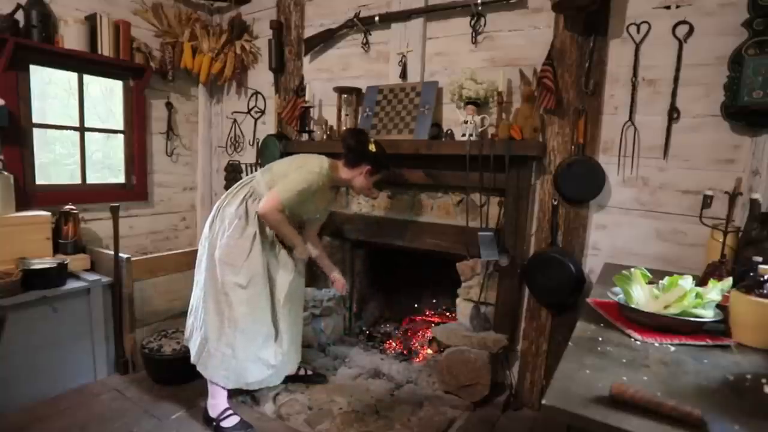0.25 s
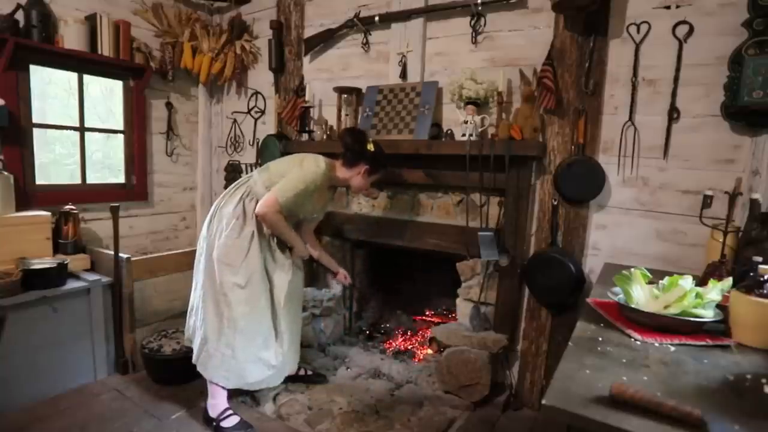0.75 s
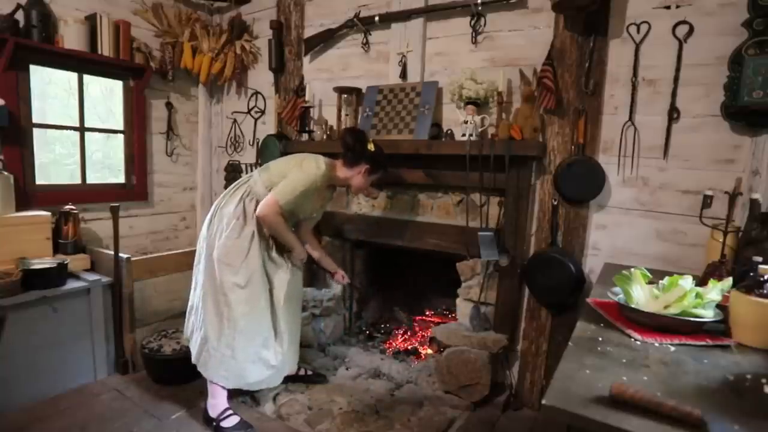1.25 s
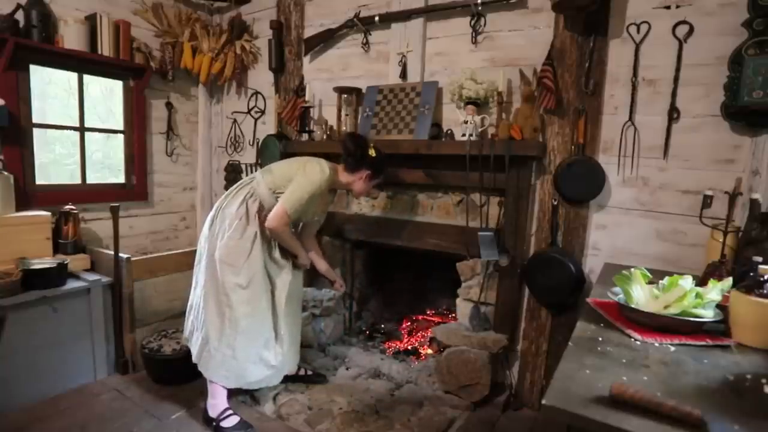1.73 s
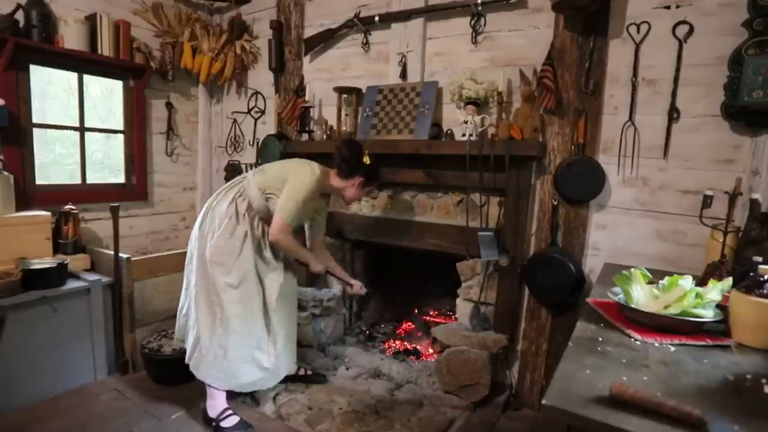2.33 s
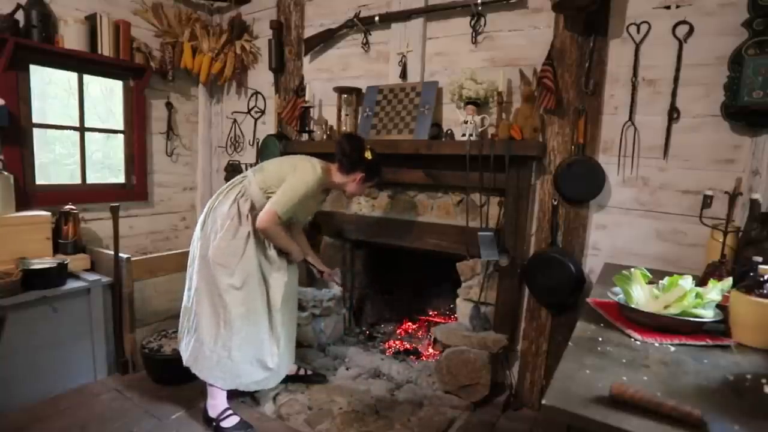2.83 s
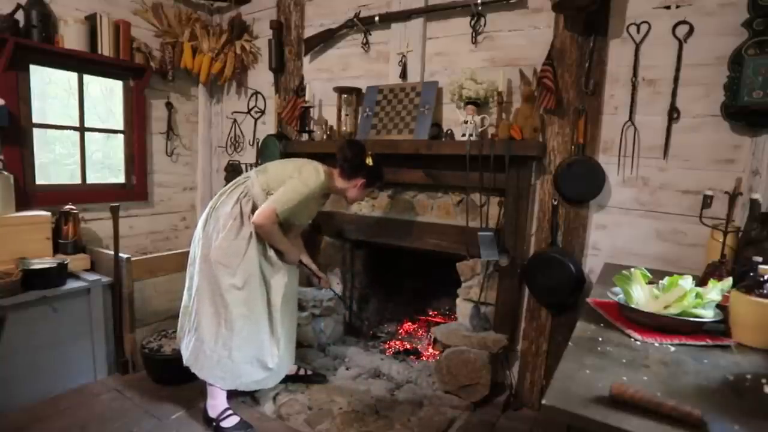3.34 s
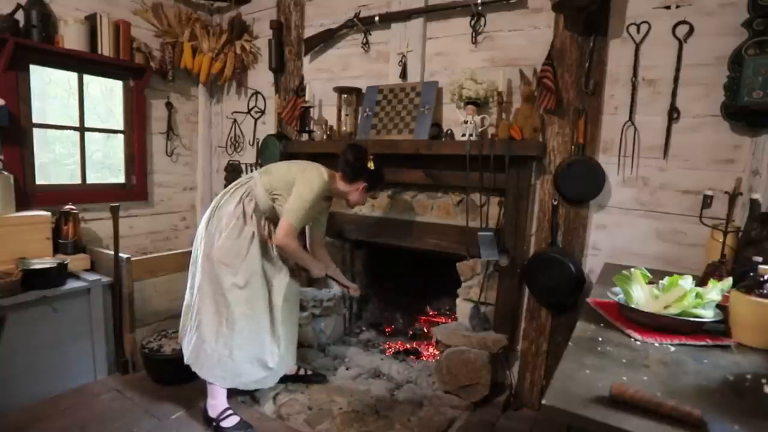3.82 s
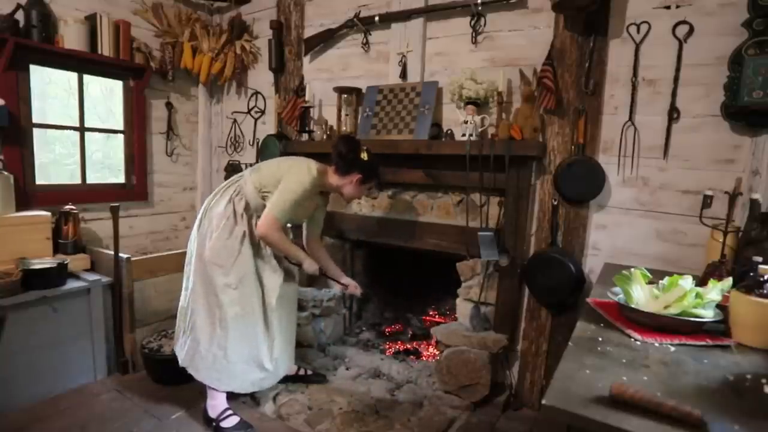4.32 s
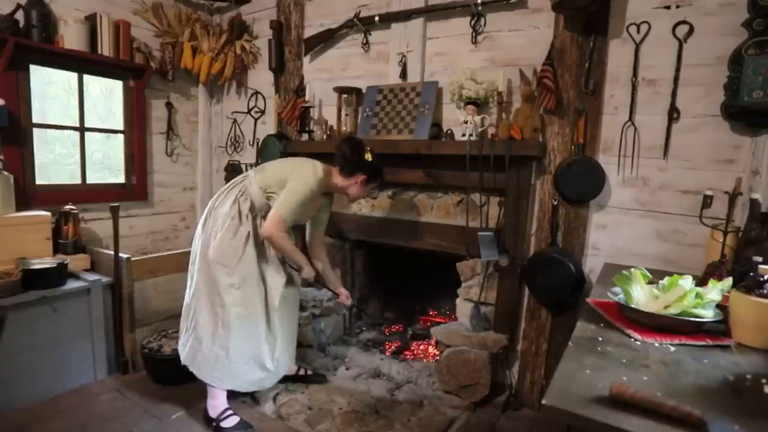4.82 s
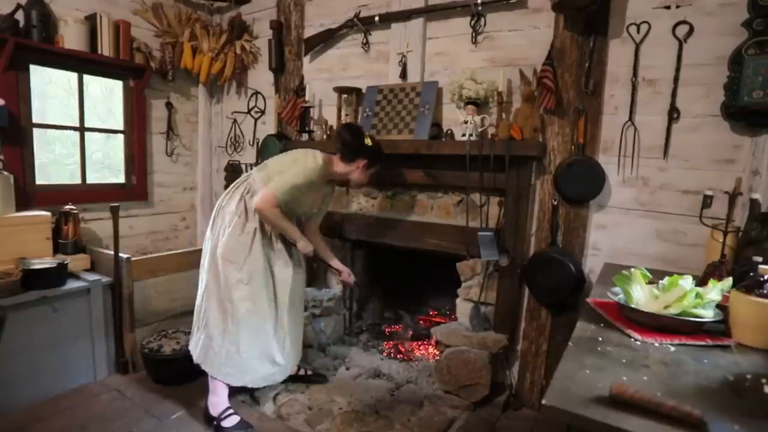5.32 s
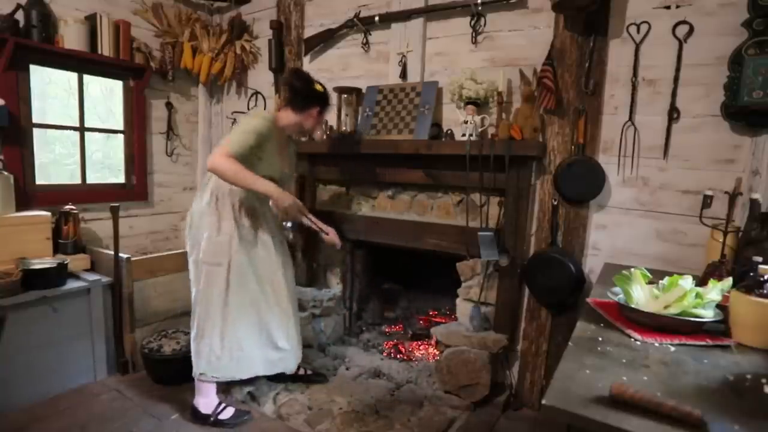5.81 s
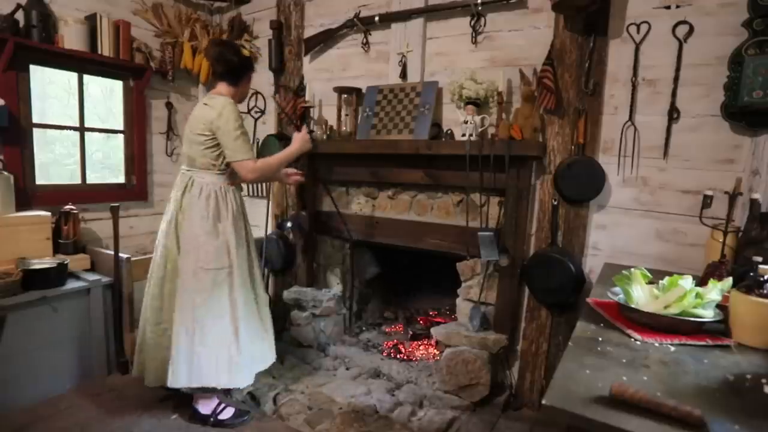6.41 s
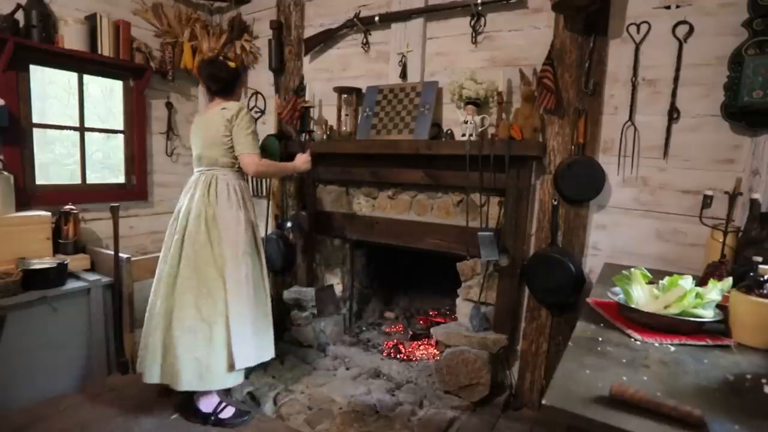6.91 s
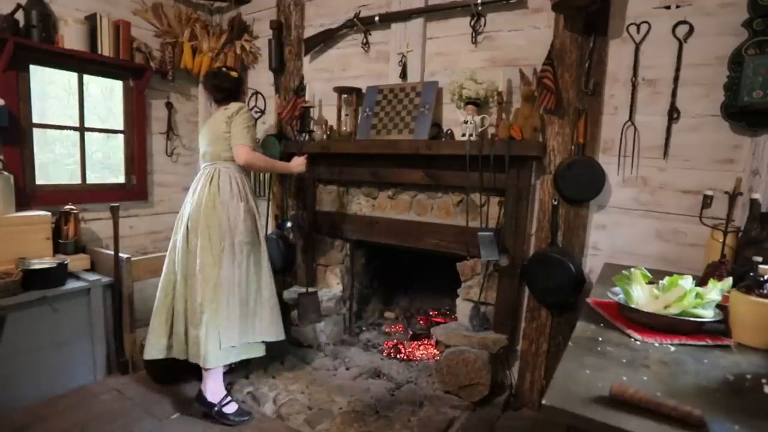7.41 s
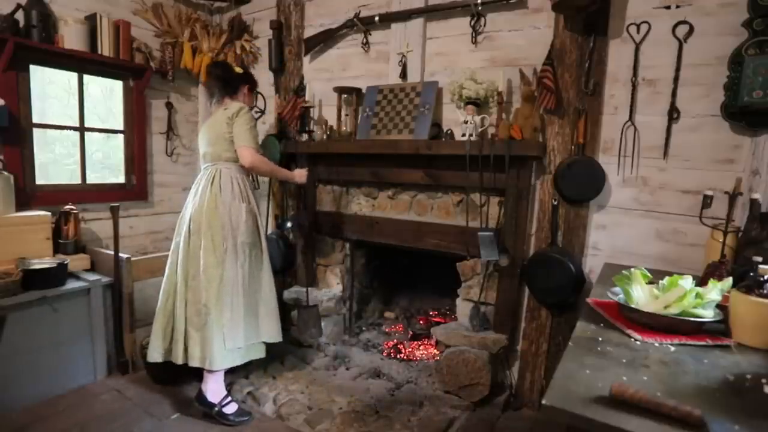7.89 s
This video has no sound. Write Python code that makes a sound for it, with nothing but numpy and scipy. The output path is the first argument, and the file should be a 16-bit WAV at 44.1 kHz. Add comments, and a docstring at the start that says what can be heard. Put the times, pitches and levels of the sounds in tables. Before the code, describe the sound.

Gritty scraping and clanking of an iron fire shovel in hot coals, a few dull steps, then one clear metal pan clang at the end.

```python
"""Shovel, embers and hanging pan

An iron shovel knocks on a stone hearth and rakes hot coals: random grains, shaped by contact force, excite iron modes.
Near the end a hanging iron pan is struck and rings as a sum of decaying sines, some of them swelling in slowly.
Steps, dropped coals and the wall behind the pan thud (noise bands and low sines); a skirt swishes (swelling noise).
Embers, crushed coals and iron tick (short noise bursts) over the fire's draught (filtered noise).
A small wooden room adds decaying noise as its echo; the recorder's gain control ducks after the loudest blows."""
import sys
import numpy as np
from scipy import signal
from scipy.fft import rfft, irfft, next_fast_len
from scipy.io import wavfile

SR = 44100
rng = np.random.default_rng(int(sys.argv[2]) if len(sys.argv) > 2 else 0)


def transcribe(u):
    """Save the signal u as a 16-bit wav file named by the first command-line argument.

    u: samples, shape (n,) or (channels, n), limited to [-1, 1]; the rate is SR.
    q: integer samples, one column per channel.
    """
    v = np.clip(np.atleast_2d(u).T, -1, 1)
    q = np.round(v * 32767).astype(np.int16)
    wavfile.write(sys.argv[1], SR, q)


N = 359415
TIME = np.arange(N) / SR   # [s]
CUTOFF_HZ = 16100   # top edge of the recorder, and of the iron's crowded upper modes

# shovel knocks and rings: struck, set down or leaned; the first row already rings at the start:
# (time [s], crunch level [dB], grit level [dB], contact time [s],
# blade ring [dB], shank ring [dB], frequency of the favoured modes [Hz])
KNOCKS = [(0.0, -48, -45, 0.0047, -62, -39.5, 1650), (0.3081, -26, -12.5, 0.002, -24, -44, 3000),
          (0.3117, 11, 1.5, 0.0024, -1, -25, 2450), (0.9958, -17.5, -6, 0.0016, -28.5, -43, 1200),
          (1.0006, -4, -12, 0.0028, -18.5, -47, 1100), (1.116, -21, -23, 0.0056, -26, -26.5, 1076),
          (1.589, -16.5, -13, .0048, -21.5, -14, 3140), (2.106, -19, -10.5, 0.0011, -19, -39, 5470),
          (2.1644, -19.5, -13, 0.0063, -18, -50, 2780), (2.211, -21, -21, 0.0088, -23.5, -52, 6500),
          (2.344, -14, -22, .006, -28, -40, 2200), (2.39, -22, -20, .0023, -31, -17, 2440),
          (2.9615, -23.5, -29, 0.0016, -51, -16, 730), (3.1065, -25, -25, 0.016, -48, -17, 2400),
          (3.195, -26, -30, .008, -41, -19, 2240), (3.272, -27, -24.5, .0034, -34, -13.5, 600),
          (3.53, -30, -48, 0.0048, -39, -50, 1650), (4.0595, -34, -24, 0.0022, -49, -15.5, 4700),
          (4.108, -48.5, -32.5, .004, -41, -22, 3680), (4.167, -49, -37.5, .0033, -60, -27, 1700),
          (4.651, -32, -29, 0.0081, -41, -41, 2400), (4.763, -11, -26, 0.0071, -19, -50, 2100),
          (4.831, -17, -21.5, 0.0045, -18.5, -45, 1300), (6.0, -55, -70, .016, -35.5, -58, 1180)]
# lumps of coal break under the blade: (time [s], crunch level [dB], grit level [dB], contact time [s])
LUMPS = [(0.558, -39.5, -41, 0.0187), (0.655, -34.5, -33.5, 0.00558), (0.921, -47, -50, .012),
         (1.516, -35.5, -35, 0.00604), (1.549, -39.5, -31, 0.00573), (1.826, -31, -31.5, 0.0074),
         (1.950, -60, -18, .001), (1.962, -29, -19.5, 0.0058), (1.9864, -14, -13, .003),
         (2.08, -35.5, -26.5, 0.0048), (2.325, -20, -30, .007), (2.471, -42, -22, 0.000975),
         (3.226, -29, -15.5, .004), (3.433, -28.5, -21, .0033), (3.638, -11.5, -12, 0.0023),
         (3.661, -14, -19, .003), (3.705, -21.5, -26.5, 0.0083), (3.9201, -20.5, -23, .002),
         (3.967, -30, -20.5, .003), (4.893, -32, -18.5, 0.00297), (5.014, -34, -42.5, .007)]
# blade drawn through the coals, or its load tipped out: (time [s], length [s], grinding level [dB],
# extra bite on entry [dB], ash hiss level [dB], change of hiss along the stroke [dB])
STROKES = [(1.514, 0.062, -38, 0, -44, 4), (1.595, 0.25, -38, 11.5, -38, 5),
           (1.989, 0.33, -33.5, 7, -35.5, 10), (2.29, .08, -20, -14, -21, -9),
           (3.196, .20, -29.5, 14.5, -29.5, 3.5), (3.435, 0.32, -29, -2.5, -36, 4.5),
           (3.85, 0.14, -36.5, -6, -37, 2), (4.063, 0.023, -33, 1.5, -28, -4),
           (4.769, .12, -25.5, 0, -26, -4.5)]
# moments when the blade sinks into ash, which smothers its ring: (time [s])
ASH_PLUNGES = [.55, 1.3, 2.5, 3.17, 4.26, 5.0]
# modes of the blade and of the long shank: (frequency [Hz], relative level [dB], T60 [s])
BLADE_MODES = [(941, -8.5, 0.89), (1058, 3, 0.43), (1154, -6, 0.38), (1340, 13, 0.19), (1505, -8, .45),
               (1556, -14.5, 0.41), (1860, -9, 0.3), (1970, -1, 0.19), (2070, -5.5, 0.23), (2267, 1.5, 0.4),
               (2360, -6, 0.66), (2547, 1, 0.27), (2570, 1.5, 0.27), (2660, -11, 0.7), (2700, -6, .35),
               (2954, 6.5, 0.52), (3030, -21, 0.39), (3180, -8, 0.45), (3673, -15.5, 0.69),
               (3810, 7.5, 0.4), (3867, 1, 0.5), (4250, -17, 0.6), (5308, -9, .28), (5300, 4.5, 0.41),
               (5860, -4, 0.095), (6260, -1.5, 0.6), (6940, -27, 0.81), (7434, -29, 0.15),
               (7790, -19.5, 0.08), (9400, -2.5, .22)]
SHANK_MODES = [(446, -4.5, 0.21), (469, 1.5, .18), (807, -15, 1.2), (782, -22, 1.6), (1013, -9, 0.42),
               (1394, -22.5, 1.1), (1770, -30.5, 0.34), (1910, -18, 0.46), (2025, 2, 0.84), (2474, 1, 0.37),
               (2600, -22.5, 0.59), (2618, 9, 0.19), (2830, 1, 0.45), (3370, -9, 0.42), (3945, -5.5, 0.61),
               (4060, -0.5, 0.29), (4360, -16, .5), (4600, 0, .2), (5316, -1.5, 0.52), (5400, -23.5, 0.28),
               (6530, -13, 0.31), (7012, 7.5, 0.083), (7800, -6.5, .25), (8400, -0.5, 0.19),
               (9050, -19.5, 0.15), (9800, -1.5, 0.19), (11600, 2.5, .2)]
# modes of the hanging pan: (frequency [Hz], relative level [dB], T60 [s], swell time constant [s])
PAN_MODES = [(647, -0.5, 0.61, 0.069), (1154.3, 2, 0.66, 0.026), (1385, -13, 0.31, 0.0025),
             (1777, -17.5, 0.95, 0.0018), (2100, -24.5, 1, 0.0051), (2591, -5.5, 0.56, 0.082),
             (2920, -18, 0.69, 0.073), (1088, 5, 0.083, 0.0047), (3630, -26.5, 0.203, .002),
             (4510, -19.5, 0.13, 0.0011), (4840, -30, 0.13, .002), (5180, -24, 0.19, .002),
             (5860, -31, 0.15, .002), (6718, -35, .2, .002), (7820, -26, 0.1, .002)]
# dull thuds: steps, dropped coals, and the wall behind the struck pan: (time [s], level [dB],
# contact time [s], top edge [Hz], boom level [dB], boom frequency [Hz])
THUDS = [(0.31, -24, .002, 500, -37, 170), (3.19, -29.5, 0.027, 704, -53, 162),
         (3.66, -35, 0.025, 400, -50, 157), (4.058, -16.5, 0.0034, 436, -27, 148),
         (4.10, -32, 0.005, 302, -41, 138), (5.609, -37, 0.011, 397, -29, 121),
         (5.731, -23.5, 0.0048, 610, -27.5, 142), (6.683, -22.5, 0.0057, 427, -21.5, 149.6),
         (6.727, -27, 0.0055, 630, -25.5, 166), (6.80, -43, 0.032, 396, -48, 170),
         (7.549, -45, 0.019, 300, -60, 164), (7.809, -27, .02, 590, -43, 130)]
# skirt swings or a sole brushes the floor: (time of peak [s], level [dB], half-width [s])
SWISHES = [(5.489, -36, 0.039), (5.64, -36, 0.024), (5.74, -44, 0.05), (6.04, -41, 0.035),
           (6.74, -36, 0.013), (6.861, -33, 0.043), (7.445, -43.5, .02), (7.58, -42, 0.028)]
# short ticks: embers crack, coals crush under the blade, iron clinks:
# (time [s], relative peak level [dB], resonance [Hz])
TICKS = [(0.2034, -34, 2030), (0.811, -30, 13600), (0.8786, -25.5, 9440), (1.328, -31, 12400),
         (1.8264, -9.5, 2930), (2.6432, -25, 9300), (2.7375, -32, 2620), (3.7978, -17.5, 4850),
         (3.8248, -14.5, 2400), (4.2878, -31, 3830), (4.3994, -30.5, 2030), (4.483, -32.5, 9000),
         (4.5242, -29, 10600), (5.255, -25, 3450), (5.3024, -30, 9800), (5.5632, -30, 10700),
         (5.9634, -31, 2360), (6.2374, -34, 2650), (6.3354, -34.5, 2450), (7.218, -34, 2000),
         (7.344, -36, 2640)]
# spectra of crushed coal, grinding, grit, iron knock, cloth and draught: (frequency [Hz], relative level [dB])
CRUNCH_SPECTRUM = [(150, -20.5), (300, -12), (700, -12), (1100, 0), (1600, -4), (2500, 1.5), (3300, -2.5),
                   (4500, -13.5), (8000, -24.5)]
GRIND_SPECTRUM = [(200, -10), (280, -13), (450, -5), (750, -4), (1300, -4.5), (2000, 0.5), (2700, -1),
                  (3600, -16.5), (5000, -11.5), (7000, -54)]
GRIT_SPECTRUM = [(1500, -29.5), (3500, -3), (5300, -2), (8000, -1.5), (12000, -1.5), (16000, -11)]
KNOCK_SPECTRUM = [(120, -17.5), (300, -14), (550, 3), (800, -5.5), (1100, -5), (1600, 2.5), (3000, -14),
                  (5000, -15.5), (8000, -24.5), (14000, -45)]
CLOTH_SPECTRUM = [(120, -33), (200, -7), (721, -2.5), (880, -5), (1360, -4.5), (1460, -6), (2650, -3.5),
                  (4240, -13.5), (12500, -27), (15000, -38)]
DRAUGHT_SPECTRUM = [(15, -39.5), (25, 1.5), (141, 4.5), (476, 0.5), (1440, -6.5), (2050, -3.5),
                    (2220, -4.5), (2840, -4.5), (3430, -10), (6210, -13.5), (8140, -16.5), (10700, -11.5),
                    (14800, -15), (16000, -17)]
# reverberation of the wooden room: (frequency [Hz], T60 [s])
ROOM_T60 = [(100, 0.21), (500, 0.43), (2000, 0.39), (6000, 0.34), (16000, 0.18)]

LUMP_BLADE_DB, LUMP_SHANK_DB = -16, -24   # ring of the iron, relative to the crunch
LUMP_RING_HZ = 1800   # modes that a breaking lump favours
STROKE_RISE_S, STROKE_FALL_S, BITE_S = 0.0067, 0.018, 0.029   # linear rise, then two time constants
ASH_T60_CYCLES = 790   # T60 of the extra fade in ash, in cycles of the mode
PAN_S, PAN_DB, PAN_KNOCK_DB = 7.8062, -2.5, -13
THUD_LOW_HZ = 124   # lower edge of every thud
BOOM_T60, OVERTONE_RATIO, OVERTONE_DB = 0.15, 1.83, -7.5   # T60 [s]; second mode, relative to the boom
TURN_S, TURN_LENGTH_S, RUSTLE_DB = 5.3, 2, -46.5   # the turn from the fire
TICK_DB, TICK_DECAY_S = 2, 0.0031   # gain on the tick table; time constant
FAINT_TICKS, FAINT_TICK_DB, FAINT_SPREAD_DB = 13, -35, 2   # number, peak level, spread either way
TICK_LOW_HZ, TICK_HIGH_HZ = 2200, 11000   # resonance range of the faint ticks


def shovel():
    """Contact excitation: coal crushes under blows and strokes, grit sprays, and both shake the iron."""
    s, crunch_db, grit_db, length, blade_db, shank_db, favoured_hz = blows()
    crunch = contacts(s, crunch_db, length) * coloured(grains(per_s=9000, spread_db=2.5), CRUNCH_SPECTRUM)
    grit = contacts(s, grit_db, length) * coloured(grains(per_s=14000, spread_db=-8.5), GRIT_SPECTRUM)

    judder = drift(rate=70)   # the edge catches and slips
    drag, spray = raking()
    drag = drag * from_db(3.4 * judder)
    spray = spray * from_db(3.1 * judder)

    crumbs = rms_one(grains(per_s=1500, spread_db=2.0))
    lumps = rms_one(grains(per_s=140, spread_db=-2))   # bigger coals crack among the crumbs
    breaks = crumbs + from_db(-2) * lumps
    grind = drag * coloured(breaks, GRIND_SPECTRUM)
    ash_grains = rms_one(grains(per_s=1800, spread_db=5.0))
    ash = spray * coloured(breaks + ash_grains, GRIT_SPECTRUM)

    rubbing = drag * rms_one(breaks)
    blade = iron(BLADE_MODES, (s, blade_db, favoured_hz), from_db(-39.5) * rubbing, scatter_db=5.0, focus_db=16.0)
    shank = iron(SHANK_MODES, (s, shank_db, favoured_hz), from_db(-55) * rubbing, scatter_db=0.0, focus_db=13.5)
    strikes = sheet(crunch + grit, low_hz=900, t60=0.039, share=0.56, count=110)
    scrape = grind + sheet(ash, low_hz=3000, t60=0.09, share=0.4, count=60)
    return strikes + shifting(scrape, patchy_db=4, rate=18, count=36), blade + shank


def blows():
    """Impulsive excitation: shovel knocks, and breaking lumps that ring the iron in proportion to crunch."""
    lumps = []
    for s, crunch_db, grit_db, length in LUMPS:
        rings_db = (crunch_db + LUMP_BLADE_DB, crunch_db + LUMP_SHANK_DB)
        lumps.append((s, crunch_db, grit_db, length, *rings_db, LUMP_RING_HZ))
    return np.transpose(list(KNOCKS) + lumps)


def raking():
    """Sliding friction: a stroke or tipped load bites, settles and lets go while its ash hiss grows or thins."""
    drag, spray = 0, 0
    for s, length, grind_db, bite_db, ash_db, change_db in STROKES:
        age = np.maximum(TIME - s, 0)
        pressed = held(s, length, STROKE_RISE_S, STROKE_FALL_S)
        drag = drag + pressed * from_db(grind_db + bite_db * np.exp(-age / BITE_S))
        spray = spray + pressed * from_db(ash_db + change_db * np.minimum(age / length, 1))
    return drag, spray


def iron(modes, blows, rubbing, scatter_db, focus_db):
    """Modal superposition: where a blow lands decides which modes ring most; rubbing drives them all."""
    times, levels_db, favoured_hz = blows
    at, out = (times * SR).astype(int), np.zeros(N)
    chance = rng.standard_normal((len(at), len(modes)))
    total = np.sqrt(np.sum(from_db(np.array(modes)[:, 1]) ** 2) / 2)
    for k, (hz, db, t60) in enumerate(modes):
        near = np.exp(-2 * np.log2(hz / favoured_hz) ** 2)   # 1 at the favoured frequency
        force = rubbing.copy()
        force[at] += from_db(levels_db + focus_db * (near - 1.0) + scatter_db * chance[:, k])
        out += from_db(db) * smothered_ring(force, hz, t60, ash_t60=ASH_T60_CYCLES / hz)
    return out / total


def smothered_ring(force, hz, t60, ash_t60):
    """Added damping: a mode rings freely until the next plunge into ash, then dies quickly."""
    out = np.zeros(N + SR // 3)
    fade = np.exp(-np.log(1000) * TIME[:SR // 3] / ash_t60)
    edges = [0] + [int(s * SR) for s in ASH_PLUNGES] + [N]
    for start, stop in zip(edges, edges[1:]):
        free = ring(np.pad(force[start:stop], (0, len(fade))), hz, t60)
        out[start:stop + len(fade)] += free * np.concatenate([np.ones(stop - start), fade])
    return out[:N]


def ring(force, hz, t60):
    """Damped resonator: a unit click sets a sine of height 1 ringing."""
    r = from_db(-60 / (t60 * SR))   # decay per sample
    w = 2 * np.pi * hz / SR
    return signal.lfilter([0, np.sin(w)], [1, -2 * r * np.cos(w), r * r], force + 1e-18)


def sheet(x, low_hz, t60, share, count):
    """High modal density: a share of the grit's power sings in the thin iron's crowd of short upper modes."""
    age = TIME[:SR // 4]
    place, phase = rng.random((2, count))
    hz = low_hz + (CUTOFF_HZ - low_hz) * (np.arange(count) + place) / count
    sines = np.sin(2 * np.pi * (hz[:, None] * age + phase[:, None])).sum(axis=0)
    modes = sines * np.exp(-np.log(1000) * age / t60)
    sung = rms_one(signal.fftconvolve(x, modes)[:N]) * np.std(x)
    return np.sqrt(1 - share) * x + np.sqrt(share) * sung


def shifting(x, patchy_db, rate, count):
    """Moving contact point: narrow regions of the spectrum swell and fade independently."""
    size = next_fast_len(N)
    spectrum, out = rfft(x, size), 0
    hz = np.arange(len(spectrum)) * SR / size
    place = np.interp(np.log(hz + 1), np.log([300, CUTOFF_HZ]), [0, count - 1])
    for k in range(count):
        region = irfft(spectrum * np.maximum(1 - np.abs(place - k), 0), size)[:N]
        out = out + region * from_db(patchy_db * drift(rate))
    return rms_one(out) * np.std(x)


def pan():
    """Free vibration: a short iron knock, then clear tones, some of them swelling in slowly."""
    start = int(PAN_S * SR)
    age = np.maximum(TIME[start:] - PAN_S, 0)
    tones = np.zeros(N)
    for hz, db, t60, swell in PAN_MODES:
        envelope = from_db(-60 * age / t60) * (1 - np.exp(-age / swell))
        tones[start:] += from_db(PAN_DB + db) * envelope * np.sin(2 * np.pi * hz * age)
    # it chatters briefly: three touches
    times = [PAN_S, PAN_S + 0.0015, PAN_S + 0.0054]
    levels_db = [PAN_KNOCK_DB + 0.5, PAN_KNOCK_DB - 2, PAN_KNOCK_DB - 2.5]
    touches = contacts(times, levels_db, [0.0006, 0.002, 0.0015])
    return touches * coloured(rng.standard_normal(N), KNOCK_SPECTRUM), tones


def thuds():
    """Soft impact: a step, dropped coals or the wall behind the pan gives a dull push and a short boom."""
    out = np.zeros(N)
    for s, db, length, top_hz, boom_db, boom_hz in THUDS:
        span = slice(int(s * SR), int(s * SR) + SR // 2)
        age = np.maximum(TIME[span] - s, 0)
        band = signal.butter(3, [THUD_LOW_HZ, top_hz], "band", fs=SR, output="sos")
        body = rms_one(signal.sosfilt(band, rng.standard_normal(len(age))))
        turn = 2 * np.pi * boom_hz * age
        boom = np.sin(turn) + from_db(OVERTONE_DB) * np.sin(OVERTONE_RATIO * turn)
        boom = boom * np.exp(-np.log(1000) * age / BOOM_T60) * (1 - np.exp(-age / 0.0016))
        out[span] += contacts([s], [db], [length])[span] * body + from_db(boom_db) * boom
    return out


def skirt():
    """Friction noise: cloth rustles through the turn and swells with each swing or brush of a sole."""
    motion = from_db(RUSTLE_DB) * held(TURN_S, TURN_LENGTH_S, rise_s=0.11, fall_s=0.08)
    swings = 0
    for s, db, width in SWISHES:
        swings = swings + from_db(db) * np.exp(-0.5 * np.minimum(((TIME - s) / width) ** 2, 60))
    flutter = from_db(-4 + 2.0 * drift(rate=40))
    return np.hypot(motion, swings) * flutter * coloured(rng.standard_normal(N), CLOTH_SPECTRUM)


def short_ticks():
    """Impulsive fracture and contact: resonant noise bursts, typed and random, over a faint random crackle."""
    ticks = [(s, db + TICK_DB, hz) for s, db, hz in TICKS]
    for when, size, pitch in rng.random((FAINT_TICKS, 3)):   # some fainter ones at random times
        hz = TICK_LOW_HZ * (TICK_HIGH_HZ / TICK_LOW_HZ) ** pitch
        ticks.append((when * N / SR, FAINT_TICK_DB + FAINT_SPREAD_DB * (2 * size - 1), hz))
    out, age = np.zeros(N + SR), TIME[:SR // 50]
    highpass = signal.butter(2, 2800, "high", fs=SR, output="sos")
    for s, db, hz in ticks:
        crack = rng.standard_normal(len(age)) * np.exp(-age / TICK_DECAY_S)
        crack += signal.lfilter(*signal.iirpeak(hz, 2, fs=SR), crack)
        crack = signal.sosfilt(highpass, crack)
        start = int(s * SR)
        out[start:start + len(age)] += from_db(db) * crack / np.abs(crack).max()
    crackle = coloured(grains(per_s=50, spread_db=4), GRIT_SPECTRUM)
    return out[:N] + from_db(-62.5) * crackle


def draught():
    """Turbulence noise: the soft, steady rush of air to the fire."""
    return from_db(-51.5) * coloured(rng.standard_normal(N), DRAUGHT_SPECTRUM)


def room(x):
    """Reverberation: dense reflections from close wooden walls, T60 set by band; unit-energy response."""
    age, tail = TIME[:SR * 2 // 3], 0
    edges = np.geomspace(60, 17000, 9)
    for low, high in zip(edges, edges[1:]):
        bandpass = signal.butter(2, [low, high], "band", fs=SR, output="sos")
        band = signal.sosfilt(bandpass, rng.standard_normal(len(age)))
        tail = tail + band * np.exp(-np.log(1000) * age / at_hz(ROOM_T60, np.sqrt(low * high)))
    tail = tail * (1 - np.exp(-age / 0.00076))
    return signal.fftconvolve(x, tail / np.linalg.norm(tail))[:N]


def contacts(times, levels_db, lengths):
    """Contact force: each rises to its level in the contact time, then lets go."""
    out = np.zeros(N)
    for s, db, length in zip(times, levels_db, lengths):
        span = slice(int(s * SR), int((s + 10 * length) * SR))
        u = np.maximum(TIME[span] - s, 0) / length
        out[span] += from_db(db) * u * np.exp(1 - u)
    return out


def held(start, length, rise_s, fall_s):
    """Movement envelope: linear attack, hold and exponential release."""
    attack = np.clip((TIME - start) / rise_s, 0, 1)
    return attack * np.exp(-np.clip((TIME - start - length) / fall_s, 0, 30))


def grains(per_s, spread_db):
    """Shot noise: random clicks of uneven size and either sign."""
    sizes = from_db(spread_db * np.minimum(rng.exponential(1, N), 4)) * rng.choice([-1, 1], N)
    return sizes * (rng.random(N) < per_s / SR)


def drift(rate):
    """Slow random modulation: straight lines between random knots, rate of them a second; rms 1."""
    knots = rng.standard_normal(int(N / SR * rate) + 2)
    return rms_one(np.interp(TIME * rate, np.arange(len(knots)), knots))


def coloured(x, spectrum):
    """Spectral shaping: follow a table, falling away below its lowest point; rms 1."""
    size = next_fast_len(N)
    hz = np.arange(size // 2 + 1) * SR / size
    low_fall = np.minimum(hz / spectrum[0][0], 1) ** 2
    return rms_one(irfft(rfft(x, size) * from_db(at_hz(spectrum, hz)) * low_fall, size)[:N])


def at_hz(points, hz):
    """Logarithmic frequency scale: interpolate a table along it."""
    f, value = np.transpose(points)
    return np.interp(np.log(hz + 0.00087), np.log(f), value)   # the offset avoids log of zero


def rms_one(x):
    """Power normalisation: scale to unit rms."""
    return x / np.sqrt(np.mean(x ** 2) + 1e-20)


def from_db(db):
    """Level definition: decibels to amplitude gain."""
    return 10 ** (np.asarray(db) / 20)


def scene():
    """Superposition: direct sounds add to the draught and to the room's echo of the impacts and scrapes."""
    coals, ringing = shovel()
    knock, tones = pan()
    dull, ticks = thuds(), short_ticks()
    sent = from_db(-4.0) * (coals + knock) + from_db(-10.5) * ringing + from_db(-5) * ticks + from_db(-6.5) * dull
    direct = coals + ringing + knock + tones + dull + skirt() + ticks
    return (direct + draught() + room(sent))[None]


def gain_control(x, threshold_db, slope, attack_s, release_db_per_s):
    """Dynamic compression: loud sound pulls the gain down quickly; it recovers at a steady rate in dB."""
    power = signal.lfilter([1 / 128], [1, -127 / 128], x ** 2)
    over = np.maximum(10 * np.log10(power + 1e-12) - threshold_db, 0) * slope
    recovery = release_db_per_s * TIME
    reduction_db = np.maximum.accumulate(over + recovery) - recovery
    r = np.exp(-1 / (attack_s * SR))
    return x * from_db(-signal.lfilter([1 - r], [1, -r], reduction_db))


def record(dry):
    """Recording chain: gain control, rounded overload, a bass roll-off and a steep top edge."""
    level = gain_control(dry[0], threshold_db=-15.5, slope=0.61, attack_s=0.006, release_db_per_s=75.5)
    clipped = level / (1 + level ** 4) ** (1 / 4)
    lean = signal.sosfilt(signal.butter(1, 100, "high", fs=SR, output="sos"), 0.92 * clipped)
    return signal.sosfilt(signal.ellip(10, 0.2, 70, CUTOFF_HZ, fs=SR, output="sos"), lean)[None]


dry = scene()
out = record(dry)
transcribe(out)
```